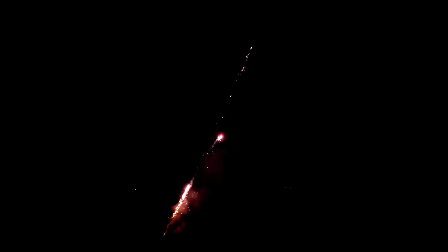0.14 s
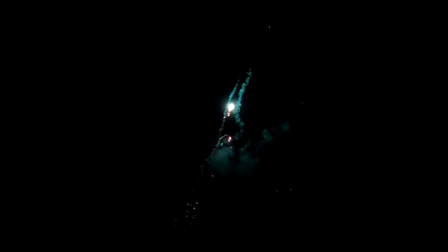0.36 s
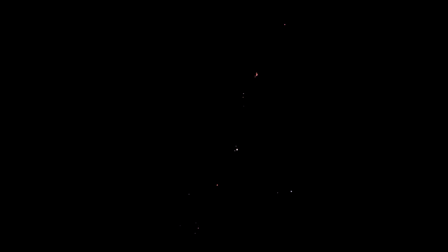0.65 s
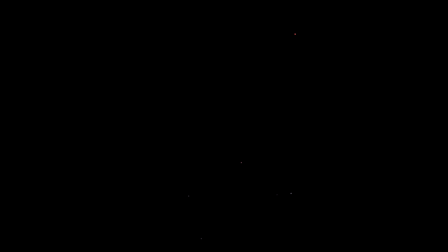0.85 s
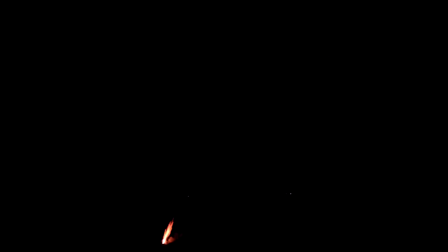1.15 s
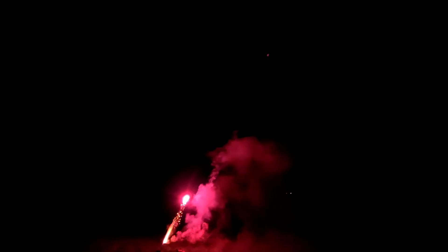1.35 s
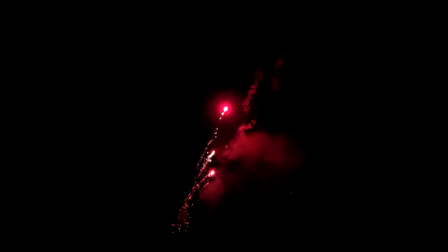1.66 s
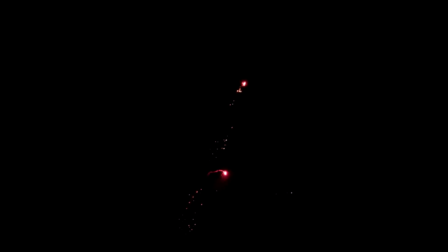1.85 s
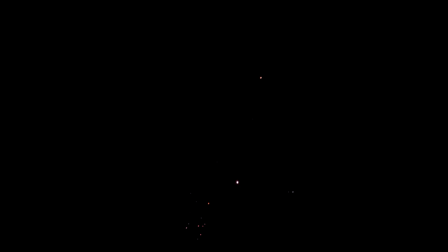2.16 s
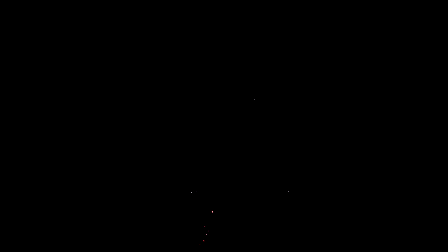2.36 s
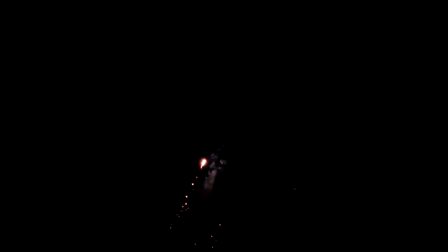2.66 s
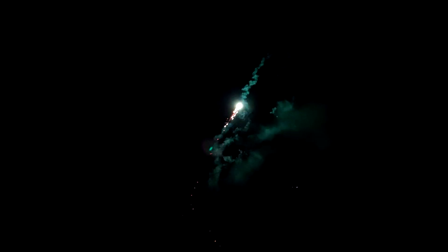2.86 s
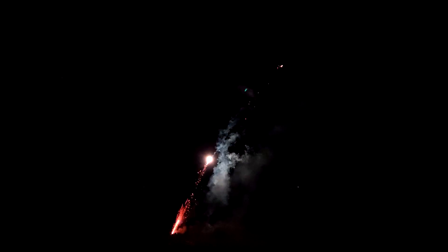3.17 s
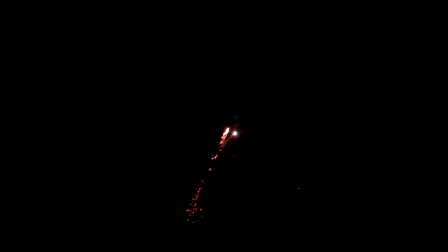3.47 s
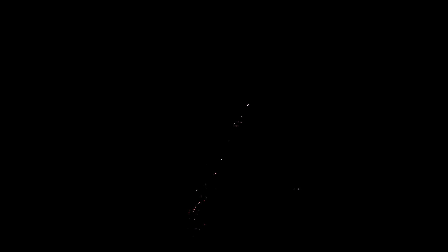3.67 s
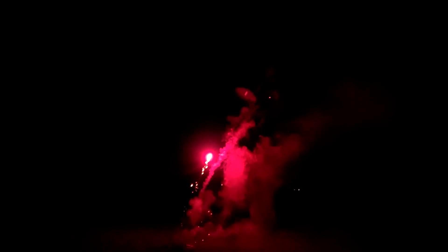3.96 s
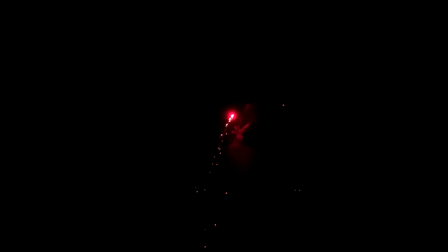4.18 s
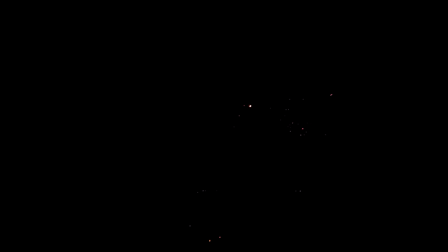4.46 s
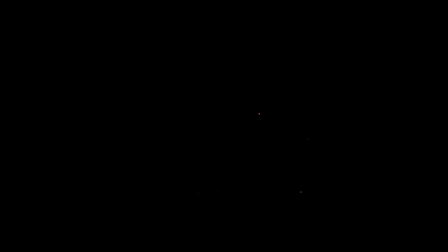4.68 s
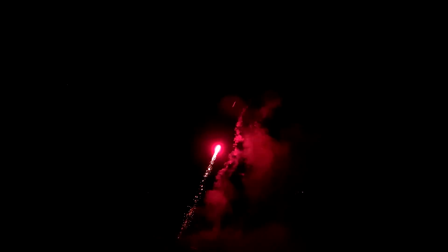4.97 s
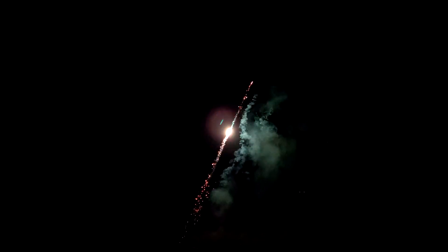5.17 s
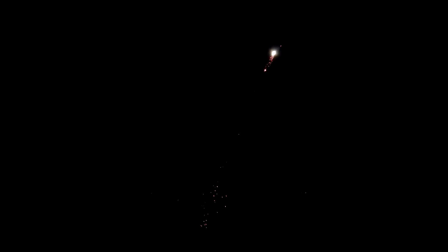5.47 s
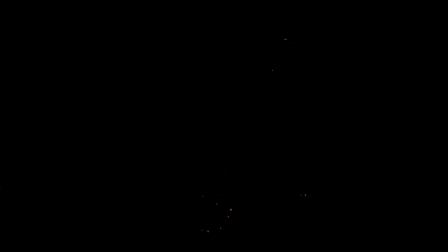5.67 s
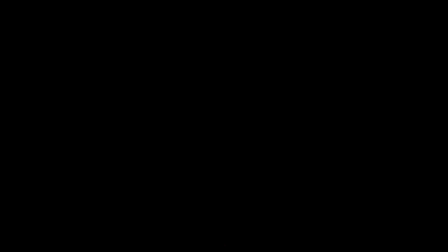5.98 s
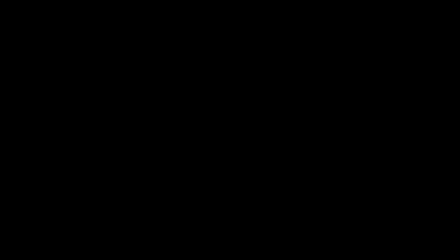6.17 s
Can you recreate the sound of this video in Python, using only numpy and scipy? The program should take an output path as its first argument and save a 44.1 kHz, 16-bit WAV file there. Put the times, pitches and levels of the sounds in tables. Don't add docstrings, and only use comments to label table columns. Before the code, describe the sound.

Outdoors, firework tubes thud softly and whoosh, their stars fizz upward, and four sharp distorted cracks slap off nearby surfaces above a low distant traffic murmur.

```python
import sys
import numpy as np
from scipy import signal
from scipy.fft import rfft, irfft, next_fast_len
from scipy.io import wavfile
from scipy.ndimage import uniform_filter1d

SR = 44100
rng = np.random.default_rng(int(sys.argv[2]) if len(sys.argv) > 2 else 0)


def to_linear_factor(level_db):
    exponent = np.asarray(level_db, float) / 20
    return 10 ** exponent


def unload_audio(sound):
    columns = np.transpose(np.atleast_2d(sound))
    steps = np.round(np.clip(columns, -1, 1) * 32767)
    wavfile.write(sys.argv[1], SR, steps.astype(np.int16))


N = 279153
TIME = np.arange(N) / SR
WALL_MS, EAVES_MS = 97, 103

# [t/s, rumble level/dB, lorry level/dB]
TRAFFIC = [
    (0, -59, -67.5),
    (1.0, -61.5, -69),
    (1.3, -60.5, -68.5),
    (2.0, -59.5, -62.5),
    (4.6, -59, -64),
    (5.4, -58.5, -53.5),
    (5.65, -62, -54),
    (6.33, -57.5, -53),
]
# [f/Hz, density/dB per Hz]
MURMUR_COLOUR = [(88, -40), (150, -11), (225, -6.5), (310, -5.5), (404, -7), (520, -8.5), (660, -6),
                 (760, -13.5), (900, -13), (1080, -23), (1750, -29), (3000, -37.5), (4500, -57),
                 (6600, -100)]
# [f/Hz, density/dB per Hz]
RUMBLE_COLOUR = [(12, -40), (20, -1.5), (54, 2.5), (75, -9), (98, -5), (113, -12), (170, -12), (220, -39.5),
                 (370, -120)]
# [t/s, f/Hz, level/dB]
WHINE = [
    (0, 1736, -77),
    (1.1, 1735, -76),
    (1.6, 1723, -90),
    (6.33, 1810, -90),
]
# [t/s, f/Hz, level/dB]
DRONE = [
    (4.2, 339, -80),
    (5.3, 332.7, -74),
    (5.6, 342, -55),
    (6.1, 341, -52.5),
    (6.33, 350, -77),
]
# [t/s, peak level/dB, f/Hz]
THUDS = [
    (0.449, -40.5, 96),
    (0.63, -34, 32.3),
    (0.698, -36, 61.5),
]
# [lit t/s, level/dB, burn time/s, sag/dB per s, top octave level/dB]
STARS = [
    (-.06, -57.5, 0.11, 18, -4.5),
    (.15, -61, 0.366, 8, -5),
    (1.22, -58, 0.44, 18.5, -3.5),
    (1.45, -49, 0.46, 30.5, -3.5),
    (2.63, -64.5, 0.38, -7, -3.5),
    (2.99, -59.5, 0.28, 2, -4),
    (3.24, -60.5, 0.27, 4.5, -2.5),
    (3.87, -53, 0.36, 19.5, -2),
    (4.92, -56, 0.189, 22, 2.5),
    (5.09, -57.5, .45, 22.5, -7.5),
]
# [f/Hz, density/dB per Hz]
FIZZ_COLOUR = [(500, -16), (1200, -1), (2500, -5), (4000, -4), (8000, -13), (11000, -14.5), (15500, -10)]
# [t/s, peak level/dB]
CRACKLES = [
    (1.8394, -56.5),
    (1.8622, -56),
    (4.2312, -39.5),
    (5.65, -48),
]
# [t/s, ground delay/ms]
LAUNCHES = [(.1447, 8.5), (1.2255, 8.5), (1.4453, 9.8), (2.6195, 13), (2.9843, 10), (3.239, 17.5),
            (3.862, 13.5), (4.9202, 7.3), (5.0882, 9.7)]
# [push level/dB, air column f/Hz, air column level/dB]
CHARGES = [
    (-27, 156.9, -29.5),
    (-28.5, 157, -40),
    (-21.5, 148, -35),
    (-24, 122.7, -32),
    (-30.5, 147, -37),
    (-30, 120, -44),
    (-23.5, 143, -33),
    (-27, 186, -36.5),
    (-24, 164, -33.5),
]
# [t/s, level/dB, swell/ms, length/ms]
GAS_RUSHES = [(0.148, -30.5, 5, 18.2), (1.23, -35.5, 9.2, 23), (1.435, -36, 3.2, 12),
              (1.448, -28.5, 2.8, 16.4), (2.624, -31.5, 5.7, 19.4), (2.969, -49, 4.7, 12.7),
              (2.987, -36, 2.94, 21.3), (3.244, -33, 4.17, 21.3), (3.866, -31, 4.1, 17),
              (4.923, -32, 3.3, 17.4), (5.091, -29.5, 3.57, 19.64)]
# [f/Hz, density/dB per Hz]
GAS_COLOUR = [(300, 3), (600, -4.5), (1000, 0), (1700, 3), (3000, -7.5), (6000, -10), (9000, -22),
              (12000, -25.5), (15500, -15.5)]
# [t/s, peak level/dB, left lag/ms, ground delay/ms, ground level/dB]
BANGS = [
    (1.10907, 6, .11, 5.33, -4),
    (2.39136, 6, .05, 3.45, -5.5),
    (4.48148, 6, .1, 3.58, -3.5),
    (6.21627, 7.5, .1, 5.1, -5),
]
# [first return/ms, level/dB, t60/s, left minus right/dB, dull above f/Hz]
YARD = [
    (3, -28, 0.027, 5, 13999.5),
    (8.5, -30, 0.101, 9, 2700),
    (5.5, -36, 0.213, -1.5, 8098.5),
    (WALL_MS, -42.5, 0.028, 2.9, 8500),
    (EAVES_MS, -47.5, 0.062, 6, 2500),
    (WALL_MS, -52, 0.36, 8.7, 5600),
    (186, -62.5, 0.01, 9, 6000),
    (17, -60.5, 1.12, 0.5, 5001),
]
# [f/Hz, gain/dB]
YARD_COLOUR = [(100, -13), (220, -2), (400, -6), (1000, -7), (2200, -3.5), (4000, 0), (9000, 1.5),
               (16000, 21)]
# [f/Hz, width/Hz, level/dB]
INLETS = [
    [(6357, 640, 14), (14800, 2600, -5)],
    [(7750, 520, 14), (14700, 1900, -0.5)],
]


def shaped(x, points):
    size = next_fast_len(x.shape[-1])
    hz, db = np.transpose(points)
    bin_hz = np.arange(size // 2 + 1) * SR / size
    gain = to_linear_factor(np.interp(np.log(bin_hz + 1), np.log(hz), db))
    return irfft(rfft(x, size) * gain, size)[..., :x.shape[-1]]


def unit(x):
    return x / np.sqrt(np.mean(x ** 2))


def pair(size, alike):
    mid, side = rng.standard_normal((2, size))
    alike = np.clip(alike, 0, 1)
    return np.sqrt((1 + alike) / 2) * mid + np.sqrt((1 - alike) / 2) * side * np.array([[1], [-1]])


def walk(rate):
    hold = int(SR / rate)
    steps = np.repeat(rng.standard_normal(N // hold + 1), hold)
    return 1.3 * uniform_filter1d(uniform_filter1d(steps, hold), hold)[:N]


def add_wave(out, s, db, rise_ms, fall_ms, suck, suck_ms):
    i = np.arange(max(int((s - .02) * SR), 0), min(int((s + .03) * SR), N))
    ms = (i / SR - s) * 1000
    after = np.maximum(ms, 0)
    push = (1 + suck) * np.exp(-(after / fall_ms) ** 2)
    suction = suck * np.exp(-(after / suck_ms) ** 2)
    out[i] += to_linear_factor(db) * (push - suction) * np.exp(np.minimum(ms, 0) / rise_ms)


def motor_note(rows, waver):
    s, hz, db = np.transpose(rows)
    turns = np.cumsum(np.interp(TIME, s, hz) * (1 + waver * walk(24))) / SR
    return to_linear_factor(np.interp(TIME, s, db) + 4.2 * walk(14)) * np.sin(2 * np.pi * turns)


def town():
    s, *columns = np.transpose(TRAFFIC)
    rumble_db, lorry_db = (np.interp(TIME, s, column) for column in columns)
    murmur_db = -51.5 + .6 * walk(15) + .5 * walk(3)
    murmur = unit(shaped(pair(N, .38), MURMUR_COLOUR)) * to_linear_factor(murmur_db)
    rumble = unit(shaped(pair(N, .75), RUMBLE_COLOUR)) * to_linear_factor(rumble_db + 1.9 * walk(25) + 7)
    growl = signal.lfilter(*signal.iirpeak(228, 4, SR), pair(N, .6))
    lorry = unit(growl) * to_linear_factor(lorry_db + 2.6 * walk(21) - 3.5)
    notes = motor_note(DRONE, .006) * np.array([[1], [.3]]) + motor_note(WHINE, .007)
    thuds = np.zeros(N)
    for s, db, hz in THUDS:
        add_wave(thuds, s, db - 3, 200 / hz, 150 / hz, .8, 500 / hz)
    return murmur + rumble + lorry + notes + thuds


def burning():
    catch_s, brighten_s = .0512, .12
    dies_db_s, ember_db, ember_db_s = 110.5, -14, 22
    body, top = np.zeros((2, N))
    for s, db, burn_s, sag_db, top_db in STARS:
        since = np.maximum(TIME - s, 0)
        spent = np.maximum(since - burn_s, 0)
        dying = to_linear_factor(-dies_db_s * spent) ** 2
        embers = (spent > 0) * to_linear_factor(ember_db - ember_db_s * spent) ** 2
        flame = to_linear_factor(db - sag_db * np.minimum(since, burn_s)) ** 2 * (dying + embers)
        body += flame * (1 - np.exp(-(since / catch_s) ** 2)) ** 2
        top += flame * (to_linear_factor(top_db) * (1 - np.exp(-(since / brighten_s) ** 3))) ** 2
    return np.sqrt(body), np.sqrt(top)


def fizz():
    body, top = burning()
    struck = rng.random(N) < 400 / SR
    sparks = struck * to_linear_factor(2.5 * rng.exponential(size=N)) * rng.standard_normal(N)
    smooth = pair(N, .3) * to_linear_factor(1.1 * walk(50) + 1.2 * walk(14))
    hiss = unit(shaped(smooth + 1.2 * sparks, FIZZ_COLOUR))
    low = signal.sosfiltfilt(signal.butter(3, 9500, fs=SR, output="sos"), hiss)
    hiss = unit(low) * body + unit(hiss - low) * top * to_linear_factor(3)
    crackle = np.zeros(N)
    for s, db in CRACKLES:
        add_wave(crackle, s, db + .5, .03, .06, .5, .3)
    return hiss * to_linear_factor(-1.5 + np.array([[1], [-1]])) + crackle


def launches():
    push = np.zeros(N)
    for (s, ground_ms), (db, column_hz, column_db) in zip(LAUNCHES, CHARGES):
        bounce = s + ground_ms / 1000
        add_wave(push, s, db, 1.8, 1.5, .75, 5.2)
        add_wave(push, bounce, db - .3, .6, .5, .9, 2.3)
        add_wave(push, bounce, db - 9, .12, .15, .9, .4)
        near = slice(int((s - .03) * SR), int((s + .08) * SR))
        since = TIME[near] - s
        swing = np.exp(np.minimum(since / .0027, 0) - (np.maximum(since, 0) / .0244) ** 2)
        push[near] += to_linear_factor(column_db) * swing * np.cos(2 * np.pi * column_hz * since)
    push = signal.sosfiltfilt(signal.butter(1, 50, "high", fs=SR, output="sos"), push)
    return push * to_linear_factor(np.array([[.7], [-.7]]))


def gas():
    body, edge = np.zeros((2, N))
    for s, db, swell_ms, length_ms in GAS_RUSHES:
        near = slice(int((s - .06) * SR), int((s + .12) * SR))
        ms = (TIME[near] - s) * 1000
        swell = to_linear_factor(db) * np.exp(np.minimum(ms, 0) / swell_ms)
        after = np.maximum(ms, 0) / length_ms
        body[near] += swell * (.74 * np.exp(-after ** 3) + .38 * np.exp(-after / 1.01))
        edge[near] += swell * to_linear_factor(-.83) * (.75 * np.exp(-after ** 3) + .37 * np.exp(-after / .23))
    noise = unit(shaped(pair(N, .85), GAS_COLOUR)) * to_linear_factor(1.5 * walk(400))
    low = signal.sosfilt(signal.butter(2, 3000, fs=SR, output="sos"), noise)
    return (body * low + edge * (noise - low)) * to_linear_factor(np.array([[1.5], [-1.5]]))


def bangs():
    ledge_s = .00155
    out, front, wake = np.zeros((2, N)), np.zeros(N), np.zeros(N)
    for s, db, lag_ms, ground_ms, ground_db in BANGS:
        rise_ms = .06 * (ground_ms - 1.2)
        boom_db = db + ground_db - 14.5 + 3.5 * (ground_ms - 4.4)
        add_wave(front, s, db, .02, .07, .3, .8)
        for mic, late, near_db, suck in zip(out, (s + lag_ms / 1000, s), (-6, -10.5), (.3, .18)):
            bounce = late + ground_ms / 1000
            add_wave(mic, late, db, .015, .06, suck, .8)
            add_wave(mic, late + .00212, db + near_db, .05, .11, .8, .3)
            add_wave(mic, late + ledge_s, db + near_db - 9.5, .03, .07, .4, .3)
            add_wave(mic, bounce, db + ground_db, rise_ms, .1, 1.7 * suck, .5)
            add_wave(mic, bounce + ledge_s, db + ground_db - 9, .2, .15, .7, .45)
            add_wave(mic, bounce + .0033, boom_db, .9, 1.1, .5, 2.6)
        since = TIME - s - ground_ms / 1000
        wake_db = db - 18 + 9 * (ground_ms - 4.5)
        wake += (since > 0) * to_linear_factor(wake_db - 60 * np.maximum(since, 0) / .033)
    rough = signal.lfilter(*signal.iirpeak(1700, 1.2, SR), pair(N, .22))
    return out + wake * unit(rough) * to_linear_factor(np.array([[-6], [-11]])), front


def yard(front):
    t = TIME[:SR]
    echo = 0
    for ms, db, t60, pan_db, dull_hz in YARD:
        since = t - ms / 1000
        grain_db = 2 * walk(900)[:len(t)]
        fade = (since > 0) * to_linear_factor(db - 60 * np.maximum(since, 0) / t60 + grain_db)
        swarm = fade * pair(len(t), .17) * to_linear_factor(np.array([[pan_db], [-pan_db]]) / 2)
        echo = echo + signal.lfilter(*signal.butter(1, min(dull_hz, 20000), fs=SR), swarm)
    return signal.fftconvolve(shaped(front, YARD_COLOUR)[None], echo, axes=1)[:, :N]


def scene():
    direct, front = bangs()
    blasts = signal.sosfilt(signal.butter(3, 115, "high", fs=SR, output="sos"), direct + yard(front))
    return town() + fizz() + launches() + gas() + blasts


def inlet(x, modes):
    return x + sum(to_linear_factor(db) * signal.lfilter(*signal.iirpeak(hz, hz / width, SR), x) for hz, width, db in modes)


def top_cut(x):
    return signal.sosfilt(signal.butter(12, 16440, fs=SR, output="sos"), x)


def record(dry):
    heard = np.array([inlet(x, modes) for x, modes in zip(dry, INLETS)])
    heard = signal.sosfilt(signal.butter(1, 22, "high", fs=SR, output="sos"), heard)
    capsule_hiss = to_linear_factor(-63.5) * rng.standard_normal(dry.shape)
    heard = np.clip(heard + capsule_hiss, -1, 1)
    heard = signal.sosfiltfilt(signal.ellip(8, .1, 50, 15720, fs=SR, output="sos"), heard)
    return top_cut(np.clip(heard, -1, 1))


dry = scene()
out = record(dry)
unload_audio(out)
```